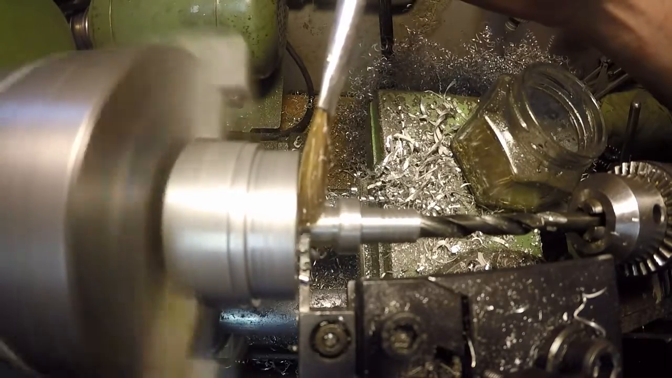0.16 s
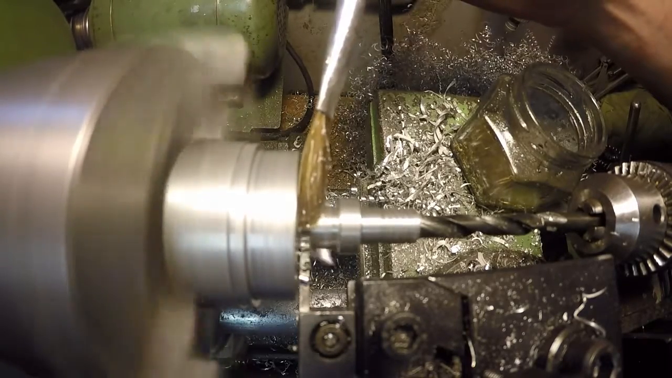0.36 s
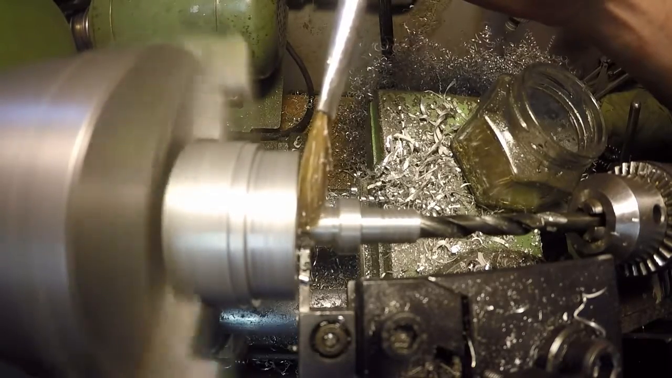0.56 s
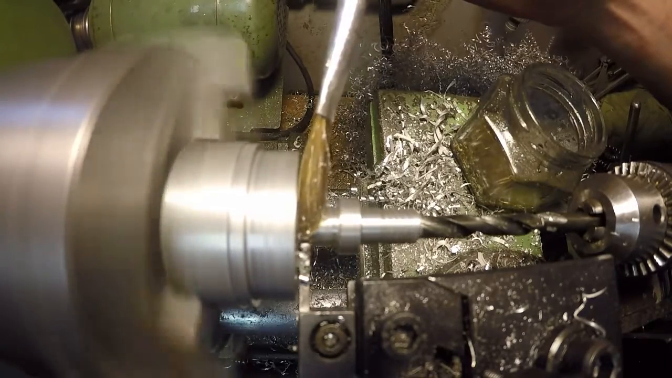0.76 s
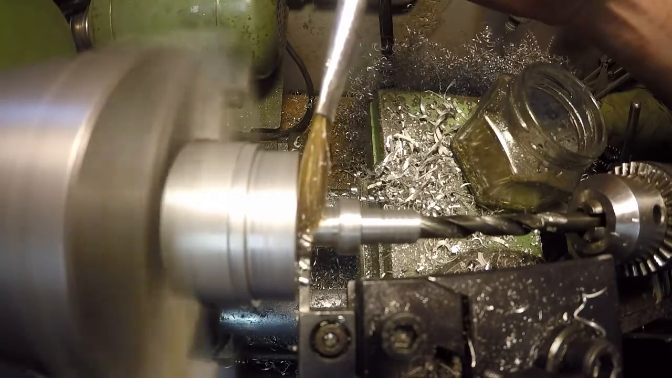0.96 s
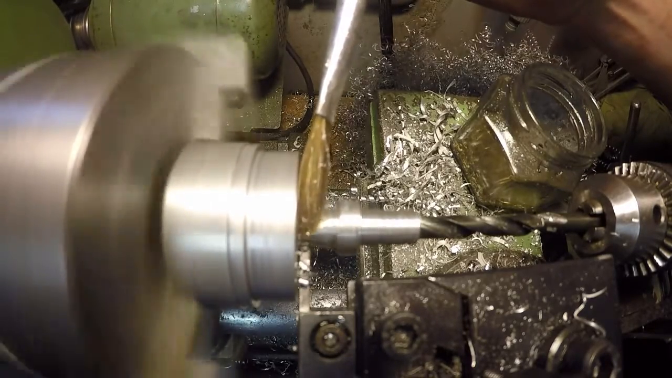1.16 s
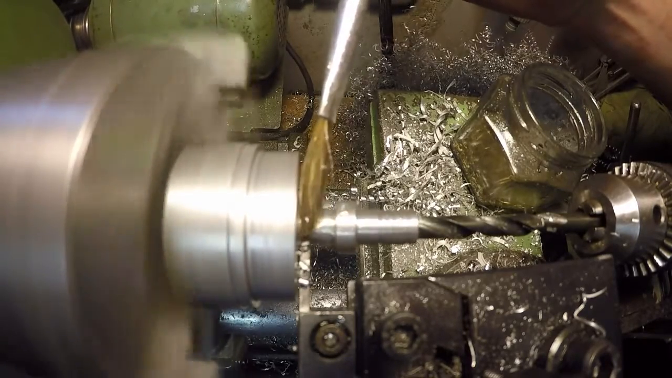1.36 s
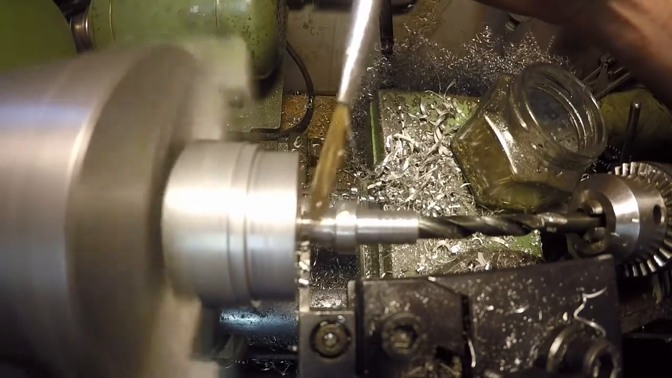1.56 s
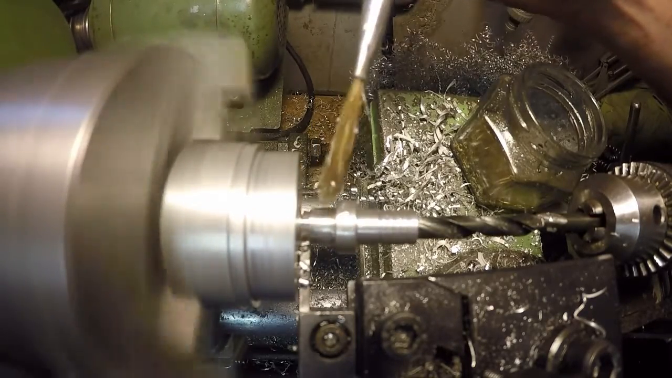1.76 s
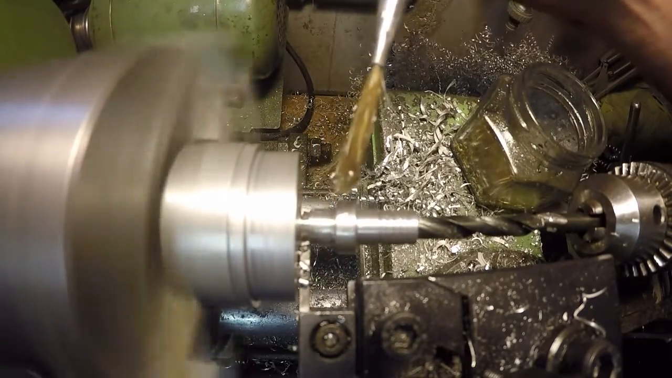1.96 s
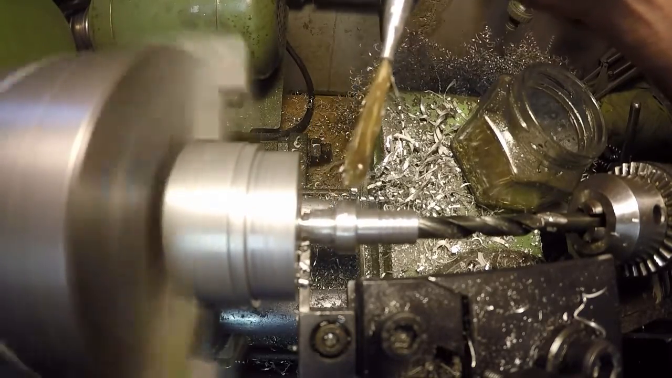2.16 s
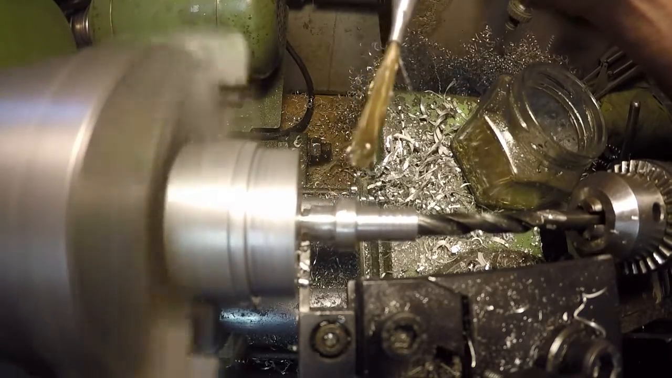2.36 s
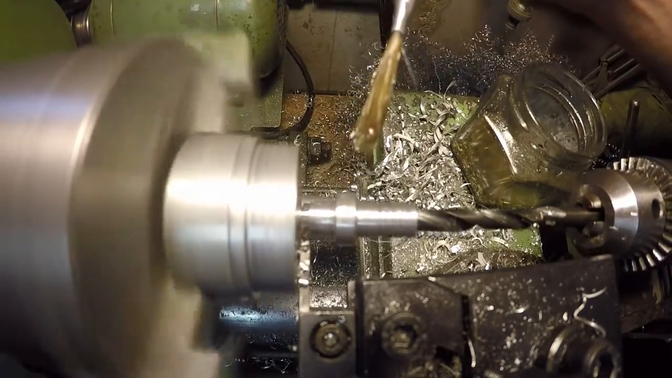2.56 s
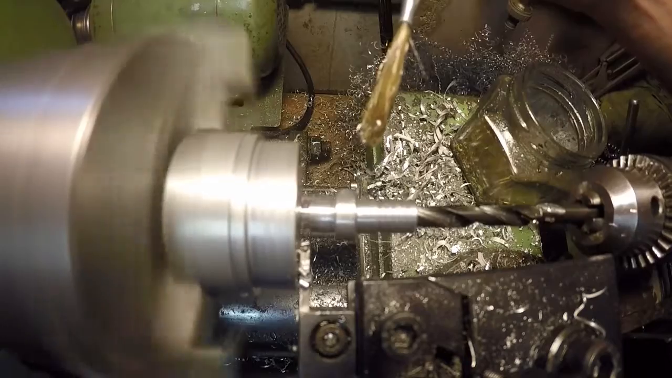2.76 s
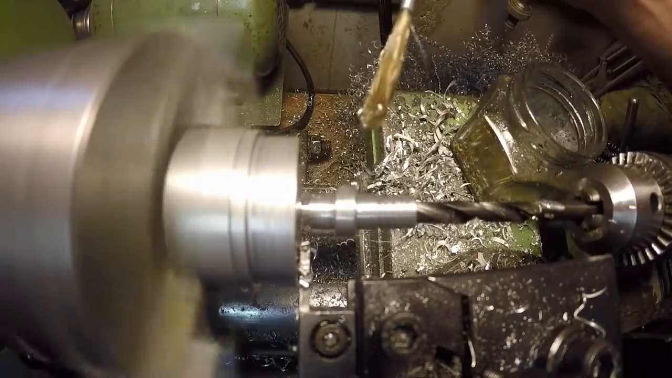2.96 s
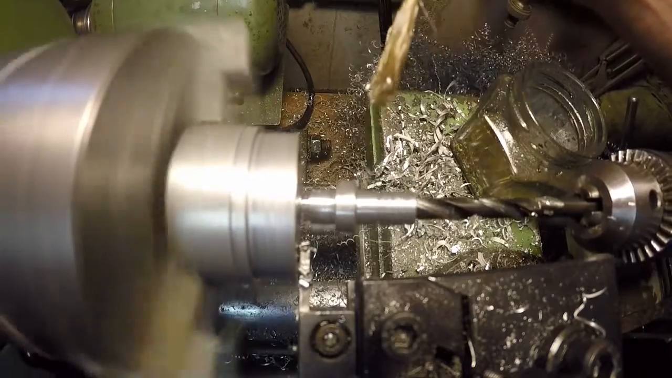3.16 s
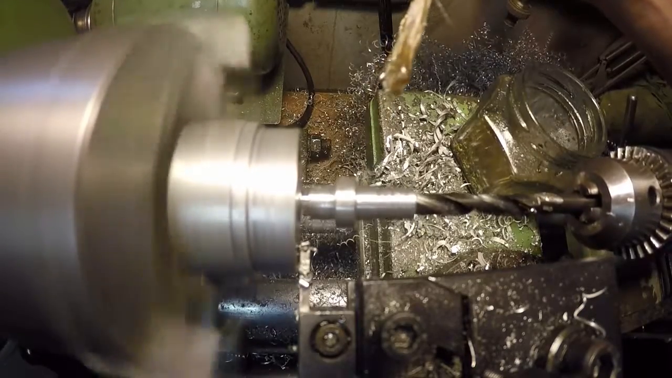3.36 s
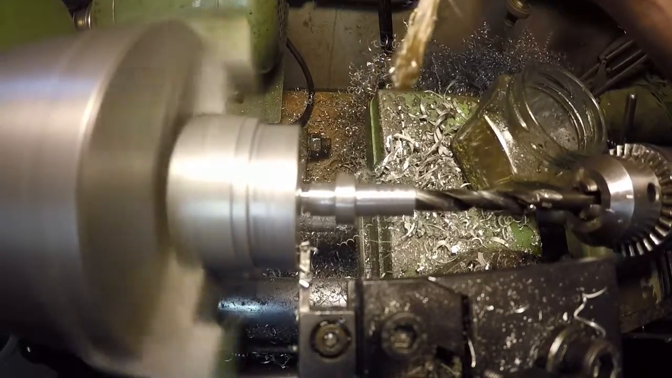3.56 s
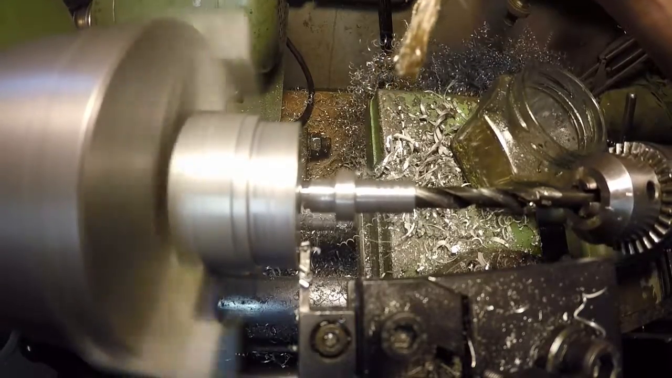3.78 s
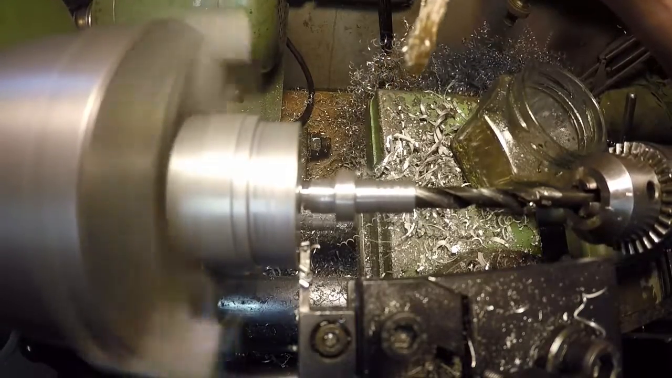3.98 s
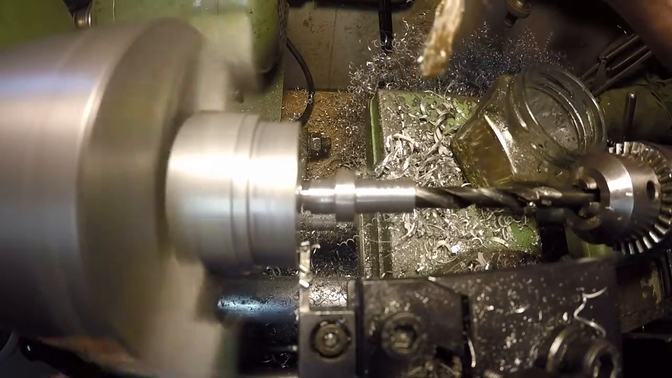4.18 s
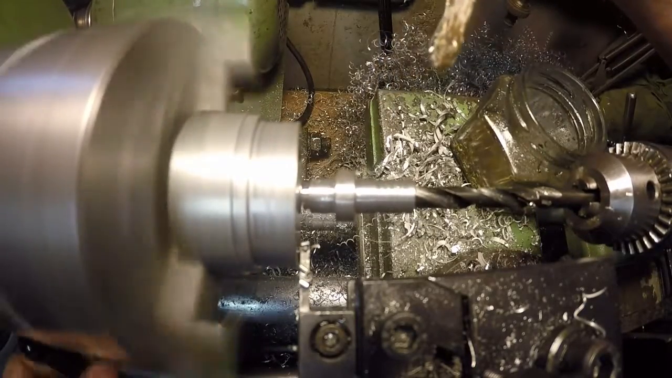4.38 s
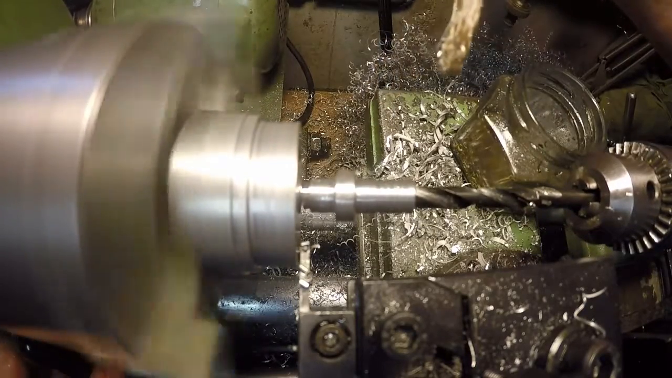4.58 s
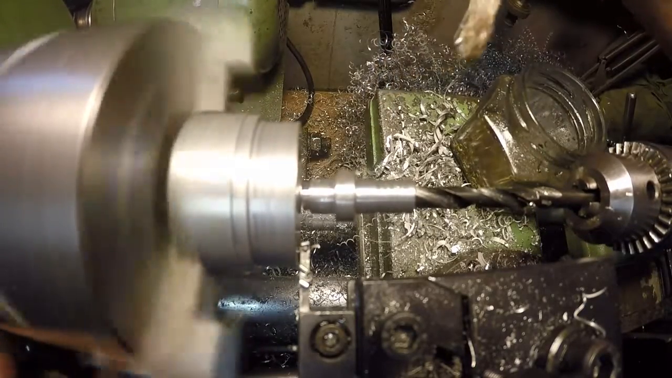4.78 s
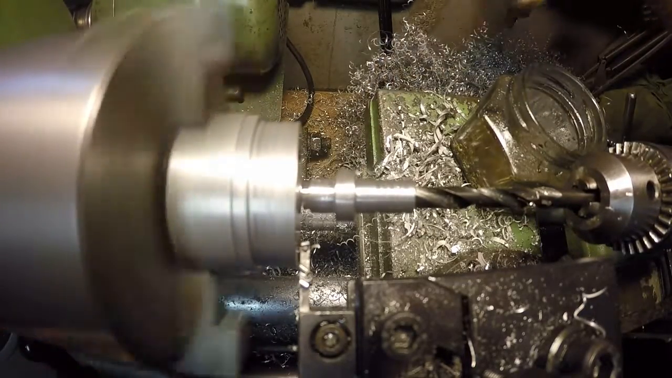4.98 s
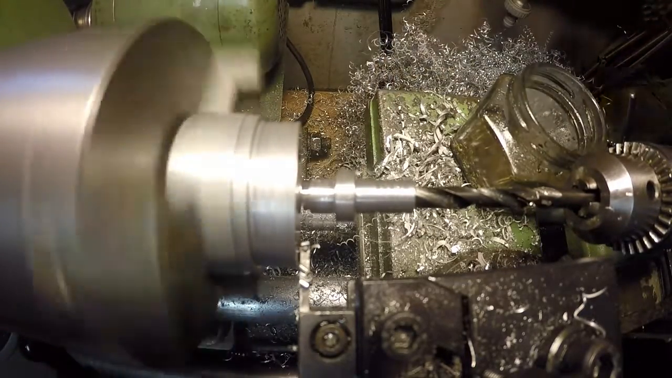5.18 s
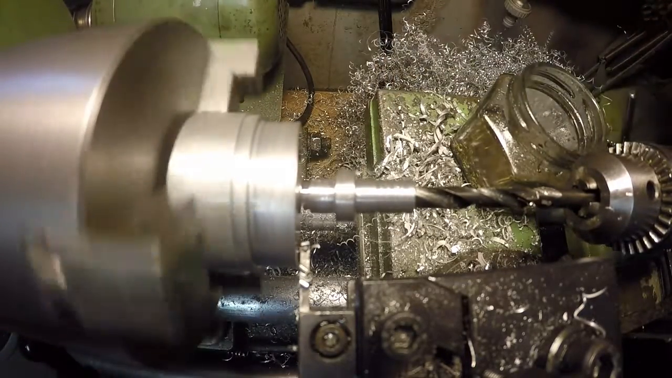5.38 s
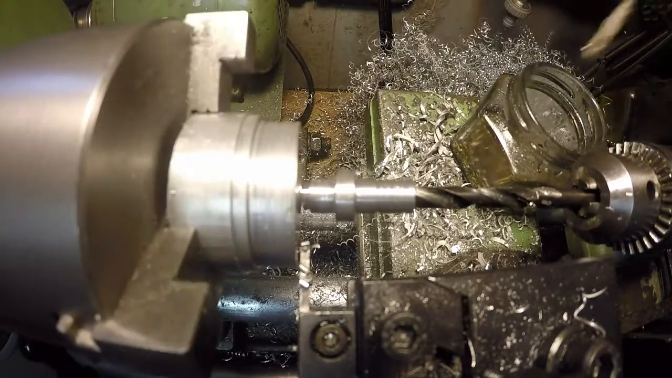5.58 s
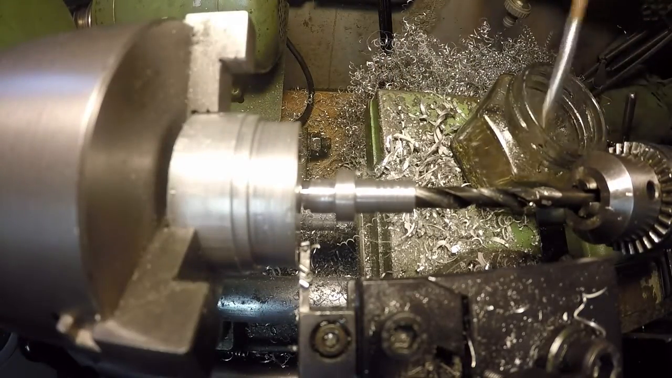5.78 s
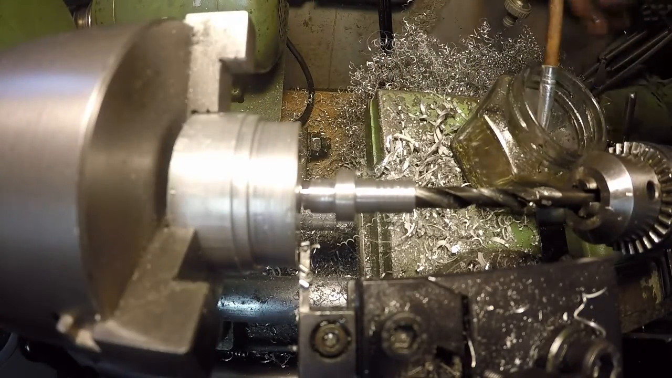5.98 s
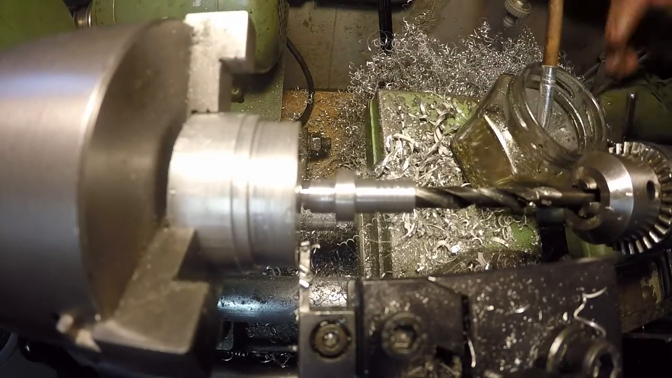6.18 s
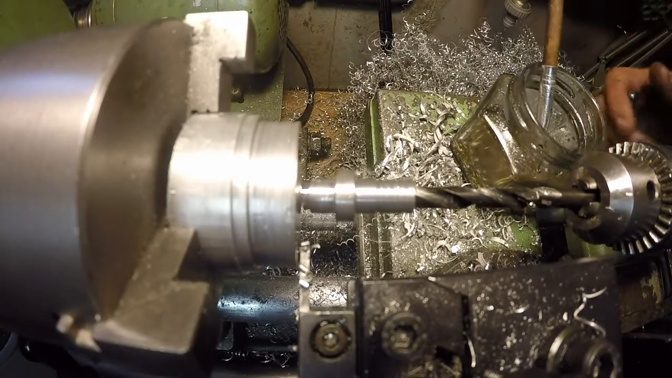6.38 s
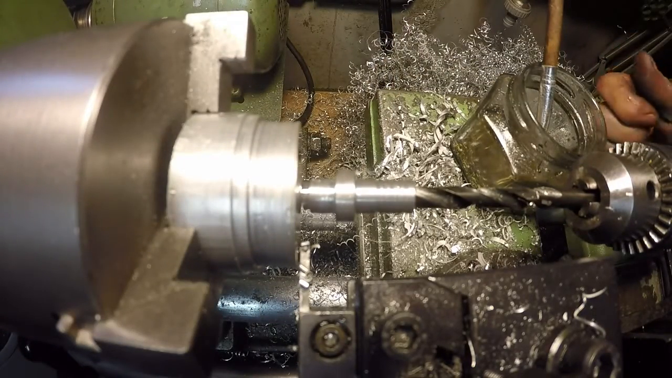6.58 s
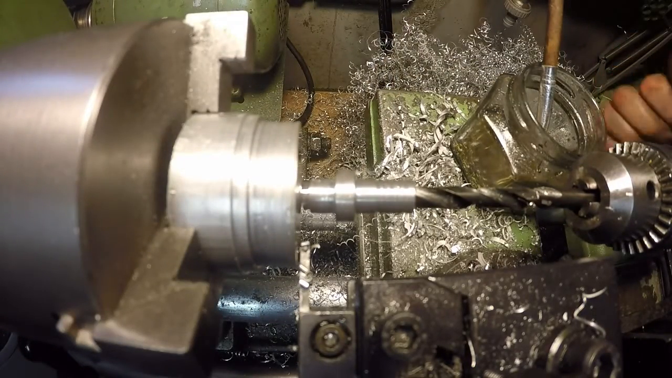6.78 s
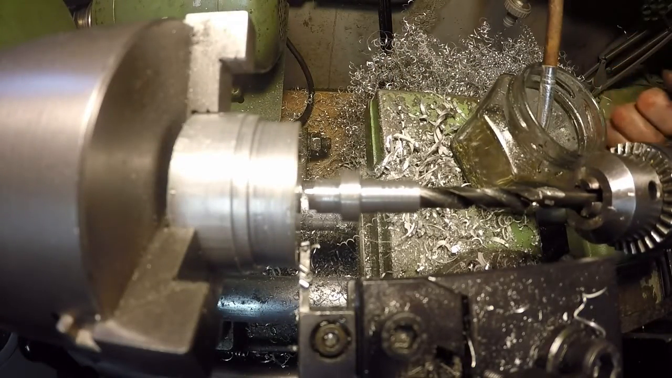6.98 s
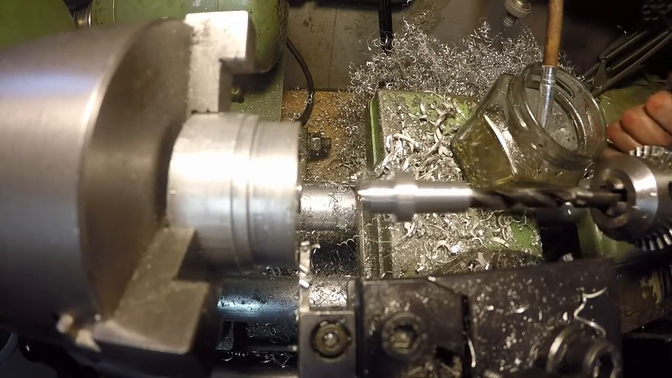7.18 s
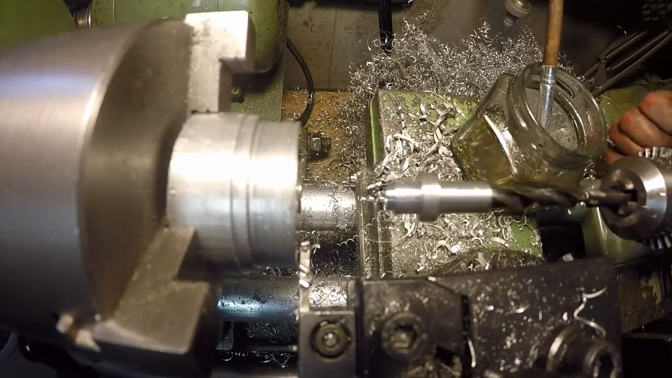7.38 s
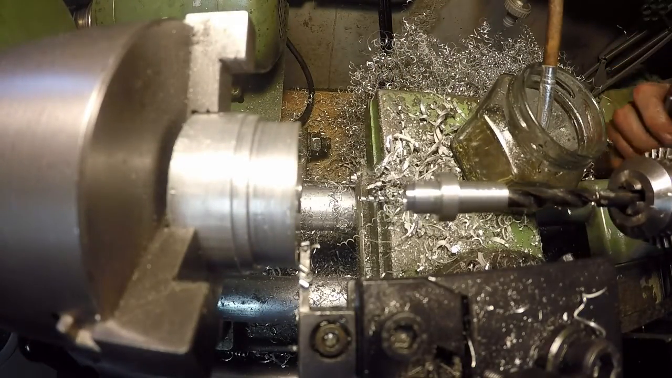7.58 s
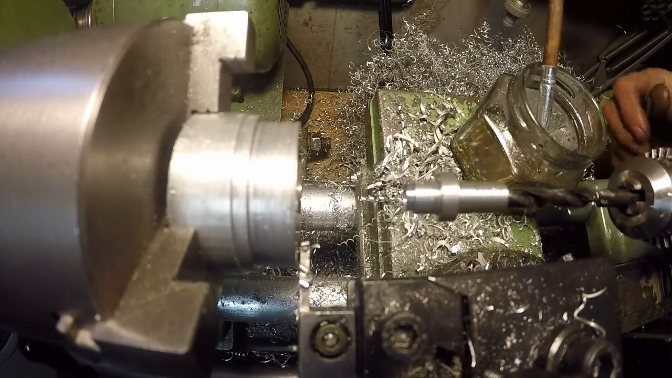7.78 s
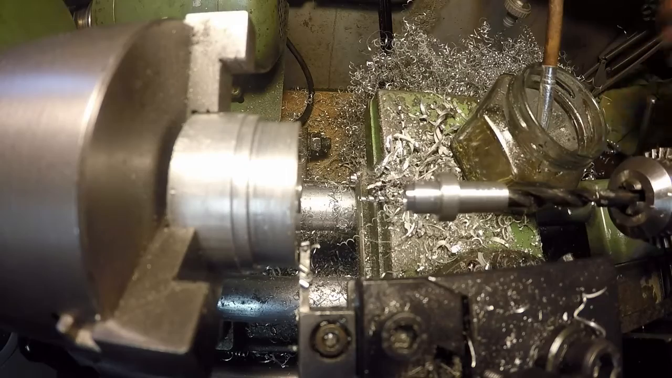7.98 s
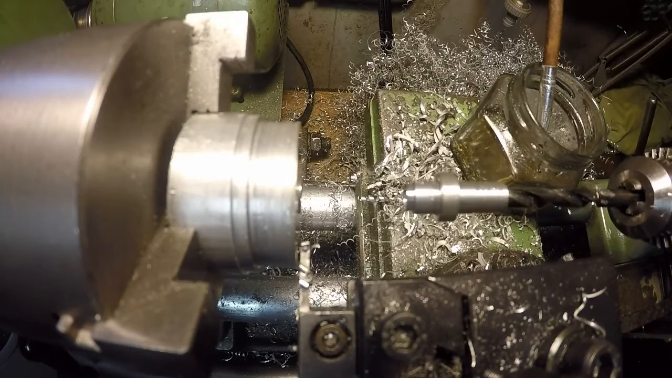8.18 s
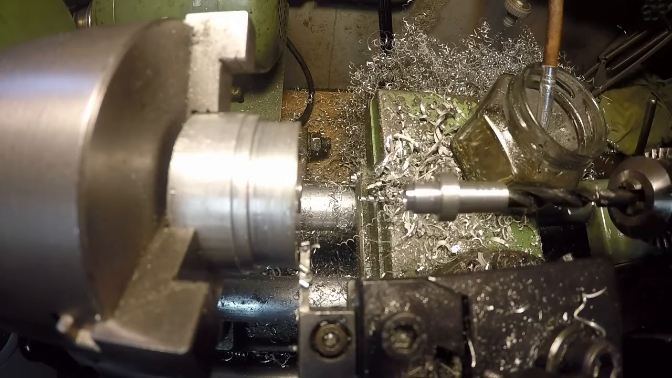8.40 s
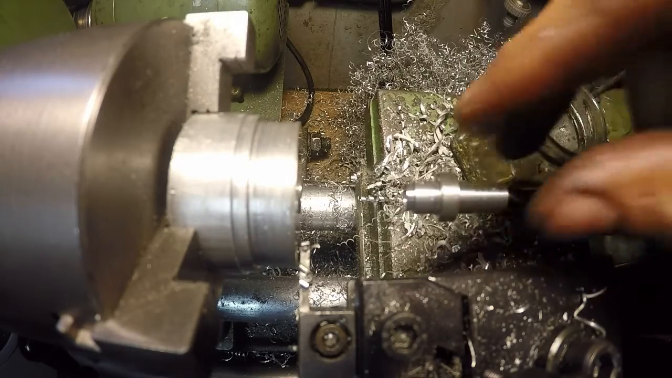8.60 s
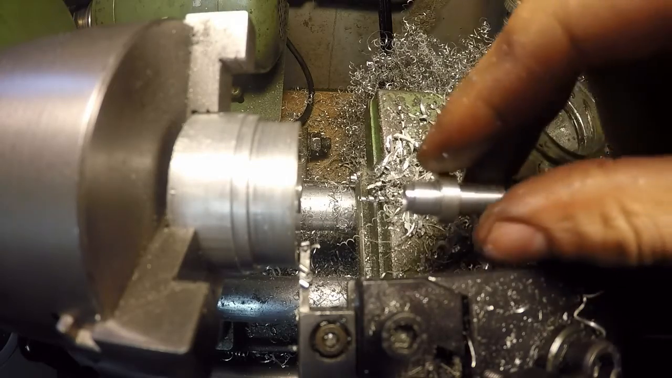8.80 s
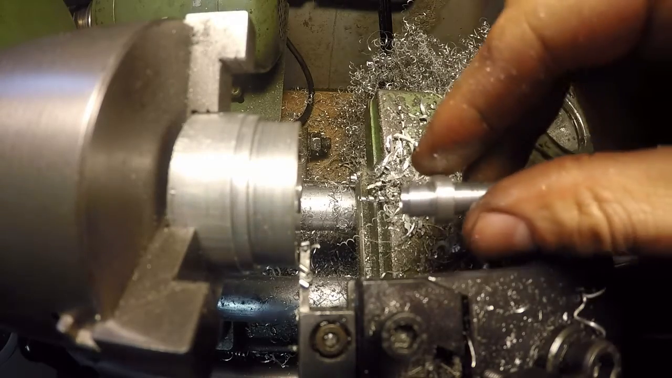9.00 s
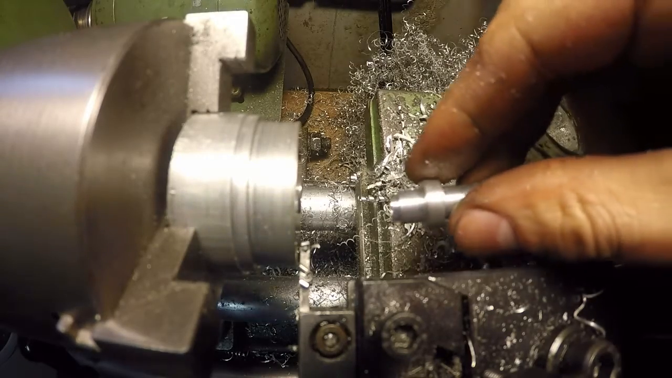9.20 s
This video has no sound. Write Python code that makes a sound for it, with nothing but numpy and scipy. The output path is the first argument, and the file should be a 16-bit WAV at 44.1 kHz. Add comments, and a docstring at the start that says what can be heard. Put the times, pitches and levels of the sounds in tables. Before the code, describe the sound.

A geared metal lathe runs close by with a steady whine, low rumble and pulsing hiss. From the start a drill screeches and judders in the spinning part, then groans and breaks through with a clunk at about 1.2 seconds. The lathe whines on alone until a switch clicks near 4.6 seconds. The whine sinks, loose gear teeth rattle, and short high squeaks and a couple of knocks follow before it stops at about 5.6 seconds. At 5.9 seconds a brush clinks into a glass jar. The workshop is now quiet. After a light knock, a clamp lever clacks loudly at 6.8 seconds, and the tailstock slides back with soft iron scraping until about 8 seconds, with a firm knock at 7.5. From 8.8 to 9.2 seconds the loose part rattles on the drill in quick, light knocks and ticks.

```python
"""A geared metal lathe whines close by while a drill screeches through the spinning part and breaks out.
Meshing teeth make the whine; shearing chips ring the drill. The lathe is switched off: the whine sinks,
slack teeth rattle, the spindle squeaks to a halt. An oil brush drops into its glass jar, the tailstock
is unclamped and slid back along its ways, and fingers rattle the part on the drill."""
import sys
import numpy as np
from scipy import signal
from scipy.fft import rfft, irfft
from scipy.io import wavfile
from scipy.ndimage import uniform_filter1d

SR = 44100
rng = np.random.default_rng(int(sys.argv[2]) if len(sys.argv) > 2 else 0)


def file_out(sig):
    """Save sig as 16-bit WAV at sys.argv[1]."""
    # one column per channel
    cols = np.atleast_2d(sig).T
    # limit, then scale
    lim = np.clip(cols, -1, 1)
    pcm = np.round(lim * 32767).astype(np.int16)
    wavfile.write(sys.argv[1], SR, pcm)


N = 407484
TIME = np.arange(N) / SR
HIT_TIME = TIME[:SR // 2]
FREQ_HZ = np.maximum(np.fft.rfftfreq(8192, 1 / SR), 1)
BREAKOUT_S, MOTOR_OFF_S, REST_S = 1.178, 4.59, 5.6
SPINDLE_HZ, SHAFT_HZ, WOBBLE_HZ = 5.7, 40.52, 5.9


def undb(db):
    """Decibels to gain."""
    return 10 ** (np.asarray(db) / 20)


def unit(x):
    """Scale to rms 1."""
    return x / np.sqrt(np.mean(x ** 2))


def steady(x, size=4096):
    """Hold the short-term rms at 1, keeping the fast grain."""
    return x / np.sqrt(np.abs(uniform_filter1d(x ** 2, size)) + 1e-9 * np.mean(x ** 2))


def between(start_s, end_s, fade_s=.02):
    """1 from start to end, with ramps outside."""
    return np.interp(TIME, [start_s - fade_s, start_s, end_s, end_s + fade_s], [0, 1, 1, 0])


def surge(peak_s, rise_s, fall_db_per_s):
    """Envelope that climbs to 1, then dies away."""
    age_s = TIME - peak_s
    return np.clip(1 + age_s / rise_s, 0, 1) * undb(-fall_db_per_s * np.maximum(age_s, 0))


def noise():
    """White noise."""
    return rng.standard_normal(N)


def drift(rate_hz):
    """Smooth random drift with a spread near 1."""
    hold = int(SR / rate_hz)
    steps = np.repeat(rng.standard_normal(N // hold + 1), hold)
    return 1.4 * uniform_filter1d(uniform_filter1d(steps, hold), hold)[:N]


def grains(per_s, spread_db):
    """Random tiny impacts, a few much larger than the rest."""
    impulses = (rng.random(N) < per_s / SR) * rng.choice([-1, 1], N)
    return impulses * undb(spread_db * np.minimum(rng.exponential(size=N), 4))


def humps(resonances):
    """Gain curve of steep-sided (Hz, width in Hz, dB) resonances."""
    return np.sqrt(sum(undb(2 * db) / (1 + (2 * (FREQ_HZ - hz) / width) ** 2) ** 2
                       for hz, width, db in resonances))


def slopes(points):
    """Gain curve through (Hz, dB) points."""
    hz, db = np.transpose(points)
    return undb(np.interp(np.log(FREQ_HZ), np.log(hz), db))


def through(x, gain):
    """Minimum-phase filter with the given gain curve."""
    cepstrum = irfft(np.log(gain + 1e-9))
    half = len(cepstrum) // 2
    cepstrum[1:half] *= 2
    cepstrum[half + 1:] = 0
    return signal.fftconvolve(x, irfft(np.exp(rfft(cepstrum))))[:len(x)]


def ring(modes):
    """Impulse response of decaying modes, alternating in sign."""
    return sum((-1) ** k * undb(db - 60 * HIT_TIME / t60_s) * np.sin(2 * np.pi * hz * HIT_TIME)
               for k, (hz, db, t60_s) in enumerate(modes))


def contact(decay_s, grit, rise_s=0):
    """A blow and a short scrape; a rise time makes it a soft push."""
    envelope = np.exp(-HIT_TIME / decay_s) * (1 - np.exp(-HIT_TIME / (rise_s + 1e-5)))
    force = grit * rng.standard_normal(len(HIT_TIME)) * envelope
    force[0] += rise_s == 0
    return force


def add(out, start_s, sound, peak_db):
    """Mix a sound in at the given peak level."""
    i = int(start_s * SR)
    out[i:i + len(sound)] += (undb(peak_db) * sound / np.abs(sound).max())[:N - i]


# Workshop noise spectrum. Each row: frequency in Hz, relative level in dB.
SHOP_SPECTRUM = [(12, -33), (20, 1.5), (45, -2), (217, -22), (278, -16.5), (328, -20.5), (525, -24),
                 (889, -29.5), (2100, -31.5), (4560, -33.5), (5690, -35), (7100, -39), (15000, -45)]


def workshop():
    """Faint, steady, bass-heavy noise."""
    return unit(through(noise(), slopes(SHOP_SPECTRUM))) * undb(-55.5)


def room(x, t60_s=.2, wet_db=-15):
    """Short diffuse echo off the machine and nearby walls."""
    tail = rng.standard_normal(len(HIT_TIME)) * undb(-60 * HIT_TIME / t60_s) * (HIT_TIME > .005)
    return x + undb(wet_db) * signal.fftconvolve(x, tail / np.linalg.norm(tail))[:N]


# Spindle squeaks, then faint squeals. Each row: start in seconds, length in seconds,
# first pitch in Hz, last pitch in Hz, relative level in dB.
SQUEAK_GLIDES = [(4.79, 0.057, 7000, 6400, -48), (4.845, 0.047, 5900, 5670, -45),
                 (4.905, 0.047, 4000, 3840, -42), (4.947, .08, 5480, 5100, -48),
                 (5.118, .05, 4000, 3870, -41.5), (5.197, 0.058, 5700, 5200, -50),
                 (7.837, 0.1, 5650, 6200, -76), (8.358, .13, 6760, 6050, -76),
                 (8.476, 0.13, 6050, 5800, -70), (8.57, .07, 5900, 5230, -65)]


def squeaks():
    """Dry metal contacts sing on an unsteady pitch; louder is rougher."""
    out, jitter = np.zeros(N), drift(600)
    for start_s, length_s, from_hz, to_hz, db in SQUEAK_GLIDES:
        n, i = int(length_s * SR), int(start_s * SR)
        roughness = .028 * undb(.35 * (db + 38.5))
        hz = np.linspace(from_hz, to_hz, n) * (1 + roughness * jitter[i:i + n])
        envelope = np.sin(np.pi * np.arange(n) / n)
        add(out, start_s, np.sin(2 * np.pi * np.cumsum(hz) / SR) * envelope, db + 6)
    return out


# Tailstock strokes. Each row: start in seconds, length in seconds, level in dB.
SLIDE_STROKES = [(6.72, .22, -57), (6.95, .39, -41.3), (7.38, .18, -43.5), (7.77, .13, -58)]
# Shoves on the bed. Each row: time in seconds, level in dB.
BED_SHOVES = [(6.42, -45.5), (6.84, -45.5), (7.57, -49.5), (7.92, -56)]
# Sliding contact resonances. Each row: centre in Hz, width in Hz, gain in dB.
WAY_BANDS = [(389, 69, 10), (690, 160, -2), (920, 200, 3), (1223, 144, 3.5), (1600, 250, -16.5),
             (1980, 220, -9.5), (2400, 300, -11), (3300, 900, -26), (4480, 700, -24.5)]


def tailstock():
    """Oily cast iron rubs along the ways in small slips; the bed rumbles after each shove."""
    sliding = sum(undb(db) * np.abs(np.sin(np.pi * np.clip((TIME - start_s) / length_s, 0, 1))) ** 1.3
                  for start_s, length_s, db in SLIDE_STROKES)
    shoved = sum(undb(db) * surge(at_s, rise_s=.05, fall_db_per_s=34) for at_s, db in BED_SHOVES)
    slips = grains(2500, 2.2) * undb(1.4 * drift(40))
    rub = unit(through(slips, humps(WAY_BANDS))) * sliding
    rumble_bands = [(30, 19, 2.5), (65, 36, -2.5), (176, 50, -16), (384, 54, -7.5)]
    rumble = unit(through(noise(), humps(rumble_bands))) * shoved
    return (rub + rumble) * between(6.4, 8.02)


# Wiggles of the part. Each row: start in seconds, then peaks in dB of touch, seating and seating tick.
PART_WIGGLES = [(8.769, -32, -27.5, -53), (8.836, -29, -37, -48), (8.901, -29, -27.5, -46),
                (8.967, -30, -31, -41.5), (9.082, -32, -28.5, -42.5), (9.124, -35, -28.5, -59),
                (9.189, -41, -38, -53)]
# Drill in its chuck: dull knock, metal tick. Each row: centre in Hz, width in Hz, gain in dB.
CHUCK_BANDS = [(389, 68, 5), (565, 90, -10), (700, 84, 6), (830, 110, -4), (1130, 160, -11)]
TICK_BANDS = [(1990, 300, 2.5), (2660, 750, 2), (4100, 680, -6), (5800, 2500, -16)]


def loose_part():
    """The part touches the drill, seats and drags on: paired dull knocks, each with a tick."""
    out, dragging, scraping = np.zeros((3, N))
    dull, bright = humps(CHUCK_BANDS), humps(TICK_BANDS)
    for touch_s, touch_db, seat_db, tick_db in PART_WIGGLES:
        seat_s = touch_s + .015
        touch = (touch_s, .004, touch_db, tick_db - 5)
        seat = (seat_s, .0055, seat_db, tick_db)
        for at_s, decay_s, knock_db, metal_db in (touch, seat):
            add(out, at_s, through(contact(decay_s, grit=1, rise_s=.001), dull), knock_db)
            add(out, at_s, through(contact(decay_s, grit=1, rise_s=.001), bright), metal_db)
        drag = surge(seat_s, rise_s=.022, fall_db_per_s=160)
        dragging += drag * undb(-48.5)
        scraping += drag * undb(tick_db - 15)
    slips = grains(1500, 2.5)
    return out + unit(through(slips, dull)) * dragging + unit(through(slips, bright)) * scraping


# Knocks on the machine. Each row: start in seconds, peak in dB, corner in Hz, contact decay in seconds.
MACHINE_KNOCKS = [(5.085, -17, 650, 0.0057), (5.171, -15.5, 560, .005), (5.279, -28, 500, 0.0046),
                  (5.51, -38, 450, .03), (5.865, -23, 550, 0.0033), (6.373, -30, 480, 0.0025),
                  (6.452, -46, 800, .004), (6.562, -50, 453, .005), (6.776, -45, 550, 0.0054),
                  (6.8125, -6, 2800, 0.0016), (6.8169, -11.5, 2600, 0.0024), (6.904, -34, 900, .003),
                  (7.092, -32, 400, 0.0044), (7.529, -14.5, 560, .003)]
# Bed and tailstock modes. Each row: frequency in Hz, relative level in dB, T60 in seconds.
BED_MODES = [(50, -32, .25), (288, -17.5, .13), (377.7, -7.5, 0.11), (429, -7, 0.098), (638, -4, .06),
             (710, -4.5, .05), (845, -2, .05), (970, -3, .06), (1042, -1, 0.043), (1230, -13, 0.038),
             (1545, -7, 0.045), (2000, 1, .022), (2310, -2, 0.025)]


def bed_knocks():
    """Blows ring the bed; a softer contact gives a duller knock."""
    out, bed = np.zeros(N), ring(BED_MODES)
    low_cut = FREQ_HZ / np.hypot(FREQ_HZ, 180)
    for start_s, peak_db, corner_hz, decay_s in MACHINE_KNOCKS:
        force = through(contact(decay_s, grit=.05), low_cut / (1 + (FREQ_HZ / corner_hz) ** 4))
        add(out, start_s, signal.fftconvolve(force, bed)[:len(bed)], peak_db)
    return out


# Cracks of chips, switch, jar and clamp lever. Each row: start in seconds, peak in dB, corner in Hz.
SHARP_CRACKS = [(1.1904, -27, 9000), (1.2034, -25, 12000), (4.6605, -20, 12000), (5.8533, -36, 11000),
                (6.8134, -17.5, 2700)]


def cracks():
    """Hard contacts give short, bright bursts."""
    out, tilt = np.zeros(N), slopes([(800, -20.5), (2500, 3.5)])
    for start_s, peak_db, corner_hz in SHARP_CRACKS:
        colour = tilt / (1 + (FREQ_HZ / corner_hz) ** 4.06)
        add(out, start_s, through(contact(.0068, grit=.4), colour), peak_db)
    return out


# Modes of the part, the jar on its seat and the handwheel handle.
# Each row: frequency in Hz, relative level in dB, T60 in seconds.
PART_MODES = [(824, 0, .12), (884, -6, .06)]
JAR_MODES = [(291, -14, .15), (834, 0, .06), (1055, 5, .07), (1230, 3, .04), (3854, -27, .07),
             (4387, -28, .06), (5012, -27, .06), (6686, -4, .1)]
HANDLE_MODES = [(400, -15, .08), (651, 0.5, 0.19), (781, -11, 0.16)]


def struck_objects():
    """The part clunks as the drill comes free, the brush hits the jar, the handle rings once."""
    out = np.zeros(N)
    add(out, 1.205, ring(PART_MODES), peak_db=-9.5)
    add(out, 5.8545, ring(JAR_MODES), peak_db=-14)
    add(out, 7.895, ring(HANDLE_MODES), peak_db=-38)
    return out


# Chuck hiss spectrum. Each row: frequency in Hz, relative level in dB.
HISS_SPECTRUM = [(1500, -18.5), (3000, -6), (3950, 2), (4700, 1.5), (5800, 1), (7500, -4.5), (9800, -12.5),
                 (11000, -19), (15000, -23.5)]
# Spindle rub resonances. Each row: centre in Hz, width in Hz, gain in dB.
RUB_BANDS = [(3910, 150, 0), (5650, 510, -14), (7340, 900, -20)]


def chuck_hiss(speed, angle, slack):
    """The chuck's hiss swells once a turn; a dry rub chirps on each swell and drags on when coasting."""
    swell_db = (2.5 * np.cos(angle - .15) + 1.3 * np.cos(2 * angle)) * speed
    hiss = unit(through(noise() + grains(900, 3), slopes(HISS_SPECTRUM)))
    hiss *= undb(-44.3 + swell_db - 2.5 * slack)
    touch = np.exp(6 * (np.cos(angle + .1) - 1)) * (1 - slack) + .3 * slack
    slips = grains(2500, 2) * undb(3 * drift(45))
    rub = unit(through(slips, humps(RUB_BANDS))) * touch * undb(-40.3)
    return (hiss + rub) * np.minimum(speed / .24, 1)


# Bed vibration. Each row: multiple of the spindle rate, relative level in dB.
SHAKE_ORDERS = [(5, -37), (8, -52), (9, -32), (13, -44), (14, -39.5)]


def bed_shake(speed, angle, slack):
    """The spindle shakes the bed at its harmonics, fading to a faint rumble as it slows."""
    shake = sum(undb(db) * np.sin(order * angle + rng.uniform(0, 2 * np.pi))
                for order, db in SHAKE_ORDERS) * speed
    shake *= .93 / np.std(shake[:4 * SR])
    spectrum = slopes([(15, -25.5), (28, -4), (48, 4.5), (85, -1.5), (105, -13.5),
                       (180, -13), (240, -22.5), (290, -11), (400, -28), (1000, -70.5)])
    rumble = unit(through(noise(), spectrum)) * undb(-5.5 + 5.5 * slack)
    return (shake + rumble) * (undb(-30.5) * speed ** 2.4 + undb(-56))


# Spells of brighter gear sound. Each row: start in seconds, end in seconds, tilt in dB per octave.
TILT_SPELLS = [(1.55, 1.95, 3.5), (4.3, 4.6, 2)]


def gear_tilt():
    """Lean of the whine towards its high tones, in dB per octave."""
    return sum(tilt * between(start_s, end_s, fade_s=.5) for start_s, end_s, tilt in TILT_SPELLS)


def tooth_knocks(run_s, teeth, scatter_db, swell_db):
    """One knock per tooth: wear repeats each shaft turn; the load swells once and three times a turn."""
    passed = np.floor(SHAFT_HZ * teeth * run_s).astype(int)
    at = np.flatnonzero(np.diff(passed))
    scatter, timing, polarity = rng.standard_normal((len(at), 3)).T
    wear_db, bias = rng.standard_normal((2, teeth))
    tooth = passed[at] % teeth
    angle = 2 * np.pi * tooth / teeth
    db = wear_db[tooth] + swell_db * (np.cos(angle) + np.cos(3 * angle)) + scatter_db * scatter
    landing = np.clip(at + (.0004 * SR * timing).astype(int), 0, N - 1)
    out = np.zeros(N)
    out[landing] = undb(db) * np.sign(polarity + bias[tooth])
    return out


# Gear cover resonances. Each row: centre in Hz, width in Hz, gain in dB.
COVER_BANDS = [(1522, 250, -7.5), (1739, 147, -1.5), (1956, 188, 3), (2361, 157, 0.5), (2673, 150, -1.5),
               (2870, 160, -1), (3355, 800, -12.5), (4096, 390, -11), (4550, 350, -10.5),
               (5900, 610, -22.5)]


def gear_covers(speed, run_s):
    """Fine teeth ring the covers brightly."""
    knocks = tooth_knocks(run_s, teeth=81, scatter_db=1, swell_db=.74) + .073 * noise()
    level_db = -30 + .4 * gear_tilt() - 36 * (1 - speed) - 1.1 * between(0, BREAKOUT_S)
    return steady(through(knocks, humps(COVER_BANDS))) * undb(level_db)


# Mesh tones at full speed. Each row: frequency in Hz, relative level in dB, wobble depth.
MESH_TONES = [(364.6, -33, .15), (399.4, -34, .7), (439.9, -40, .3), (480.4, -38, .5), (527, -44, .5),
              (572.9, -35, .2), (607.8, -40, .9), (642, -31, .3), (653.8, -33, .4), (694.4, -28, .35),
              (723, -27, .4), (735.1, -32, .3), (804.1, -36, .5), (850.6, -43, .5), (891.6, -42, .5),
              (932, -42, .3), (971.9, -34, .2), (978.1, -34, .2), (1013.1, -27, .25), (1047.5, -39, .6),
              (1093.4, -31, .35), (1134.6, -30, .35), (1174.4, -32, .35), (1214.6, -36, .5),
              (1256.4, -39, .4), (1291, -46, .4)]
# Gearbox casing resonances. Each row: centre in Hz, width in Hz, gain in dB.
CASING_BANDS = [(383.4, 71.5, -2.5), (490, 70, -1.5), (621, 120, 0.5), (710, 68, 4), (852, 130, -5),
                (1022, 100, -1), (1141, 128, -1), (1233, 80, -4.5)]


def gear_whine(speed, run_s):
    """Mesh tones with sidebands from out-of-true gears sink through the casing resonances on slowing."""
    casing, out = humps(CASING_BANDS), np.zeros(N)
    on = speed > 0
    tilt = gear_tilt()[on]
    turn = 2 * np.pi * WOBBLE_HZ * run_s[on]
    drifts = [drift(6) for _ in range(8)]
    for hz, db, wobble in MESH_TONES:
        phase = rng.uniform(0, 2 * np.pi, 3)
        waver, flutter = (np.roll(drifts[k], rng.integers(N))[on] for k in rng.integers(0, 8, 2))
        mesh = 2 * np.pi * hz * run_s[on] + phase[0] + .2 * waver
        sidebands = np.sin(mesh + turn + phase[1]) + .73 * np.sin(mesh - turn + phase[2])
        tone = (np.sin(mesh) + wobble * sidebands) * (1 + .2 * flutter)
        radiated = np.interp(hz * speed[on], FREQ_HZ, casing) / np.interp(hz, FREQ_HZ, casing)
        out[on] += tone * undb(db + tilt * np.log2(hz / 850)) * np.minimum(radiated, 1.5)
    return out / np.std(out[:4 * SR])


def gearbox(speed, run_s, slack):
    """Off power the teeth lose contact: whine gives way to slower, duller rattling."""
    knocks = tooth_knocks(run_s, teeth=27, scatter_db=2.4, swell_db=2)
    knocks += .045 * noise()  # sliding flanks
    whine = gear_whine(speed, run_s) * undb(-.4 - 6 * slack)
    bass_loss = 1 + (275 / FREQ_HZ) ** 10  # a small casing radiates little bass
    rattle_db = -7.7 + 8.7 * slack - 11 * (1 - speed) ** 2 + 2.5 * between(0, BREAKOUT_S)
    rattle = steady(through(knocks, humps(CASING_BANDS) / bass_loss)) * undb(rattle_db)
    thump = steady(through(knocks, humps([(404.3, 49, 0)]) / bass_loss)) * undb(4) * (1 - speed)
    meshing = (speed / .57) ** 3.4  # level knee at 57 % speed
    gain = undb(-17.5) * meshing / np.hypot(1, meshing) + undb(-54)
    return (whine + rattle + thump) * gain


def lathe():
    """All turns with the spindle, which sags slightly under the drill and later coasts to rest."""
    coast = np.clip((REST_S - TIME) / (REST_S - MOTOR_OFF_S), 0, 1) ** 1.15
    speed = coast * (1 - .003 * between(0, BREAKOUT_S, fade_s=1))  # share of full speed
    run_s = np.cumsum(speed) / SR  # equivalent time at full speed
    angle = 2 * np.pi * SPINDLE_HZ * run_s
    slack = np.clip((1 - speed) / .29, 0, 1)  # 0 = teeth driven, 1 = loose
    gears = gearbox(speed, run_s, slack) + gear_covers(speed, run_s)
    spindle = bed_shake(speed, angle, slack) + chuck_hiss(speed, angle, slack)
    return (gears + spindle) * between(0, 5.54, fade_s=.072)


# Chip screech along the feed. Each row: time in seconds, relative level in dB.
FEED_LEVELS = [(0.0, -32), (0.24, -26), (0.28, -32), (0.406, -26), (0.508, -31), (0.716, -28), (1.052, -30),
               (1.064, -34), (1.17, -33)]
# Drill and part resonances. Each row: centre in Hz, width in Hz, gain in dB.
DRILL_BANDS = [(1167, 250, 9.5), (1572, 220, 4.5), (1936, 195, 5), (2354, 117, 4.5), (2720, 140, 0.5),
               (3296, 470, -4), (4170, 340, 3.5), (4640, 330, 0), (5190, 120, -8), (5700, 150, -2),
               (6040, 220, -3), (7110, 241, -7.5), (7410, 180, -6.5), (12560, 4500, -37.5)]


def drilling(groan_hz=368):
    """Chips shear off in dense slips that ring the drill; it judders, grabs and groans at breakout."""
    feed_db = np.interp(TIME, *np.transpose(FEED_LEVELS))
    slips = grains(5000, 2.6) * undb(1.4 * drift(70))
    screech = unit(through(slips, humps(DRILL_BANDS))) * undb(feed_db + 6.5) * between(0, BREAKOUT_S)
    grab_db = 8 * between(1.08, BREAKOUT_S, fade_s=.16)
    ring_out_db = -300 * np.maximum(TIME - BREAKOUT_S, 0)
    judder_bands = [(287, 42, -12.5), (368, 40, 3), (439, 47, -4.5)]
    judder = steady(through(grains(700, 2), humps(judder_bands)), size=2048)
    groan = unit(np.sin(2 * np.pi * groan_hz * TIME + .4 * drift(90)))
    groan *= between(1.118, BREAKOUT_S - .008, fade_s=.01)
    return screech + judder * undb(-28 + grab_db + ring_out_db) + groan * undb(-17)


def scene():
    """Shop, machine and handling noises in mono; only the short sounds get the echo."""
    sustained = workshop() + lathe() + drilling() + tailstock()
    short = bed_knocks() + cracks() + struck_objects() + squeaks() + loose_part()
    return (sustained + room(short))[None]


def record(dry):
    """The microphone drops the deepest bass and the very top."""
    low_cut = signal.butter(2, 18, "high", fs=SR, output="sos")
    top_cut = signal.ellip(10, .2, 80, 15250, fs=SR, output="sos")
    return signal.sosfilt(top_cut, signal.sosfilt(low_cut, dry))


dry = scene()
out = record(dry)
file_out(out)
```